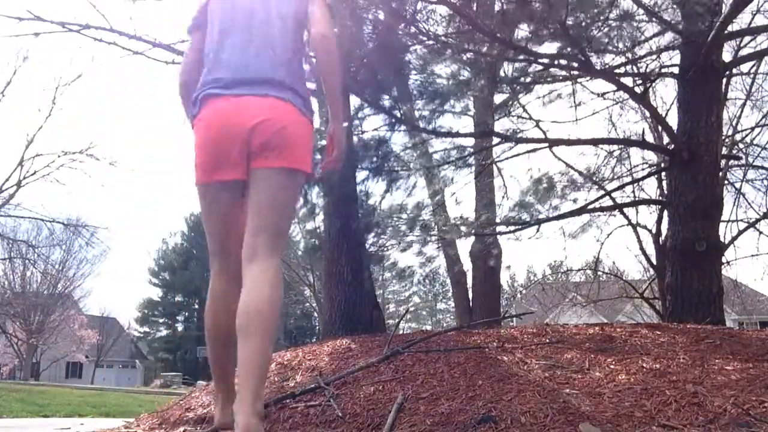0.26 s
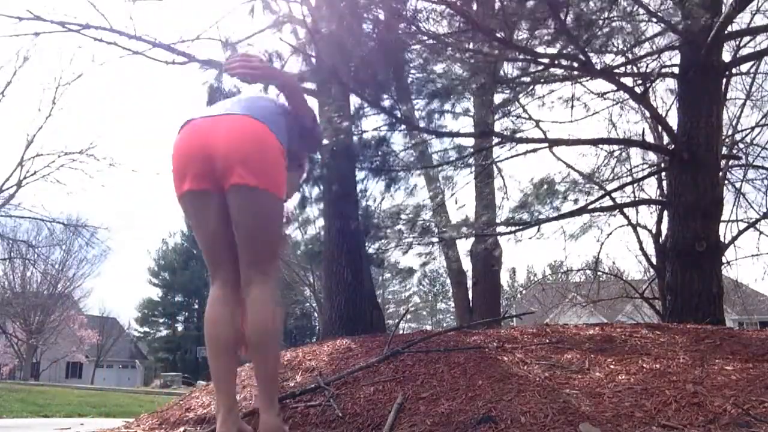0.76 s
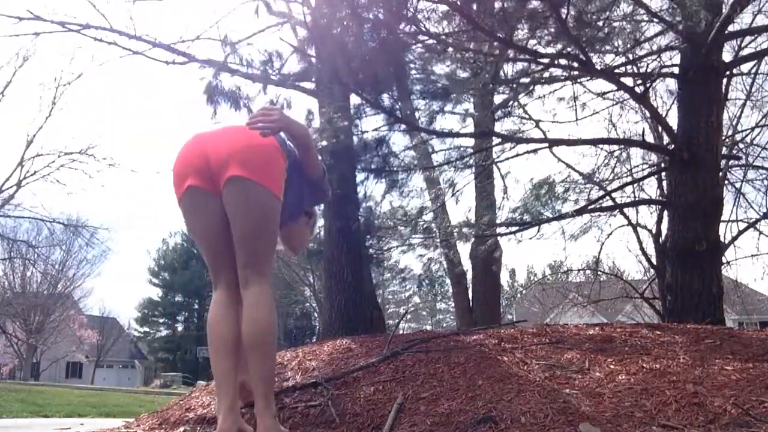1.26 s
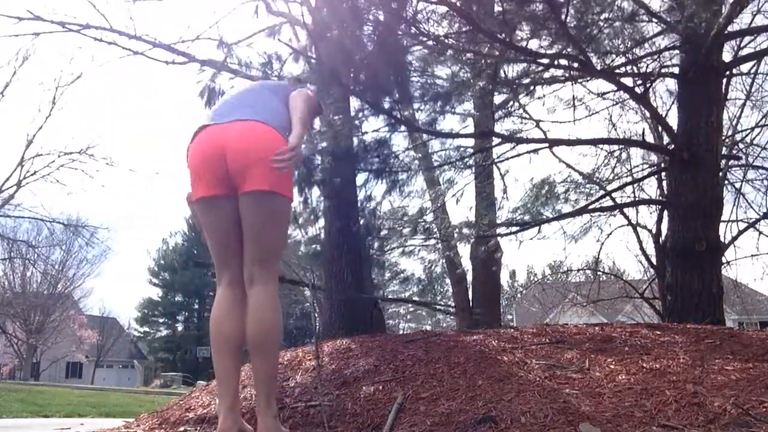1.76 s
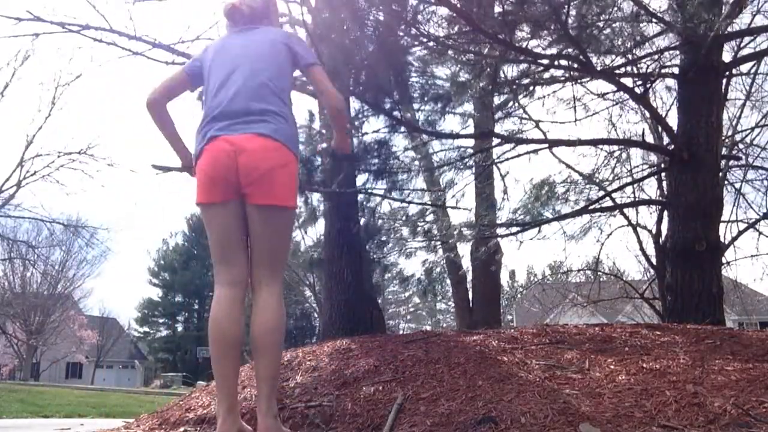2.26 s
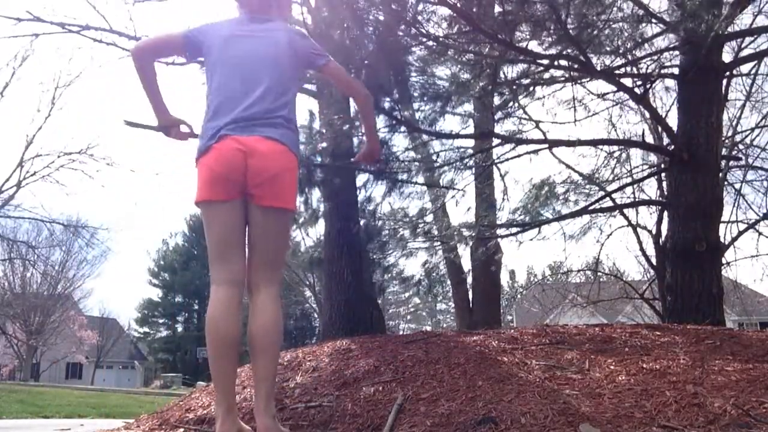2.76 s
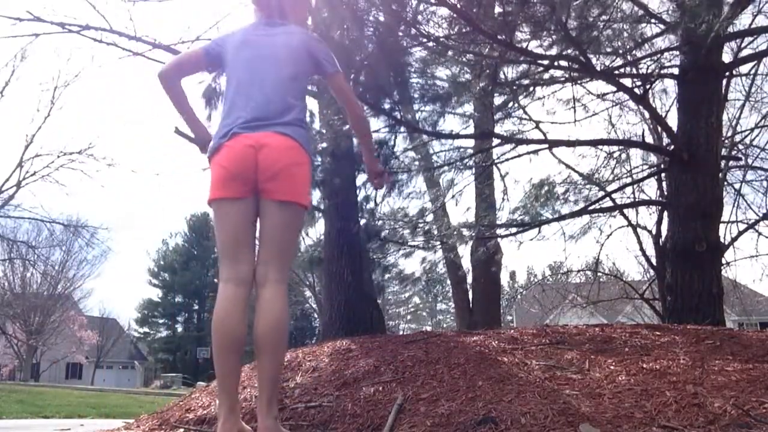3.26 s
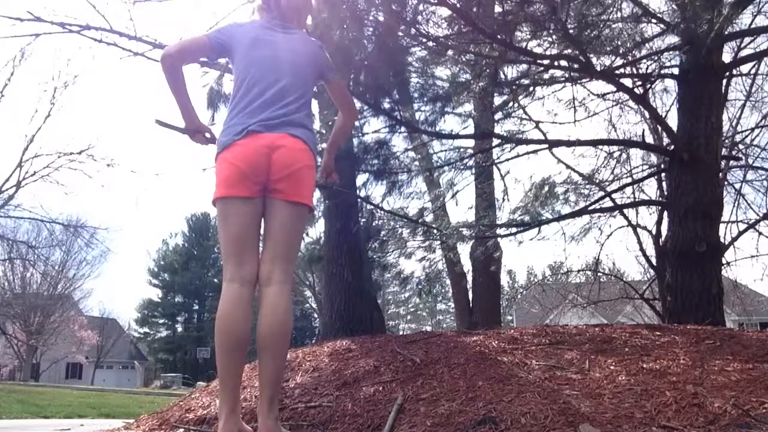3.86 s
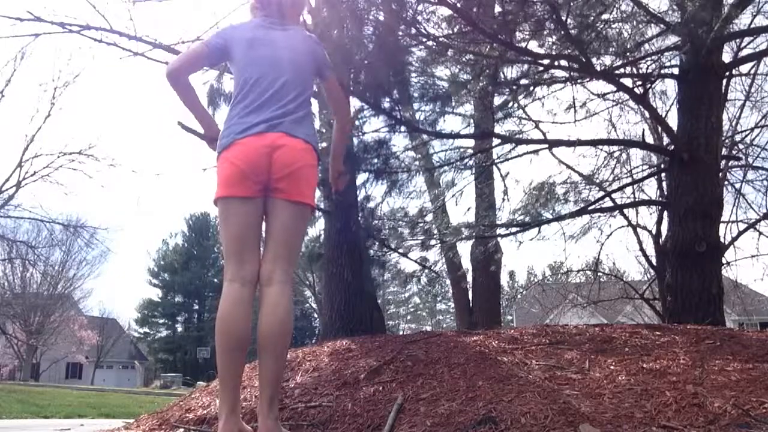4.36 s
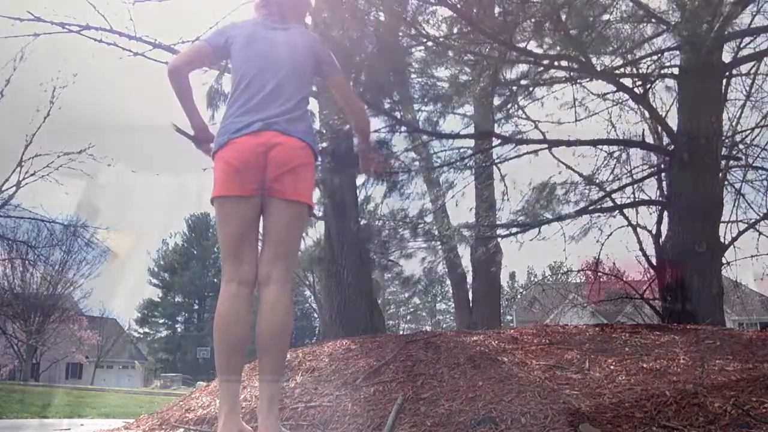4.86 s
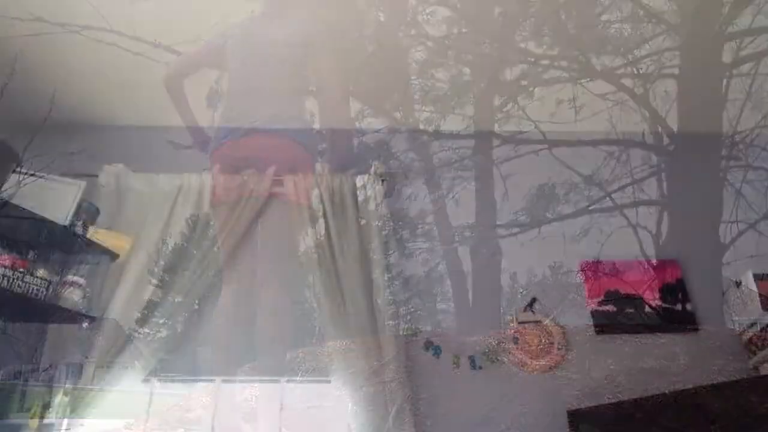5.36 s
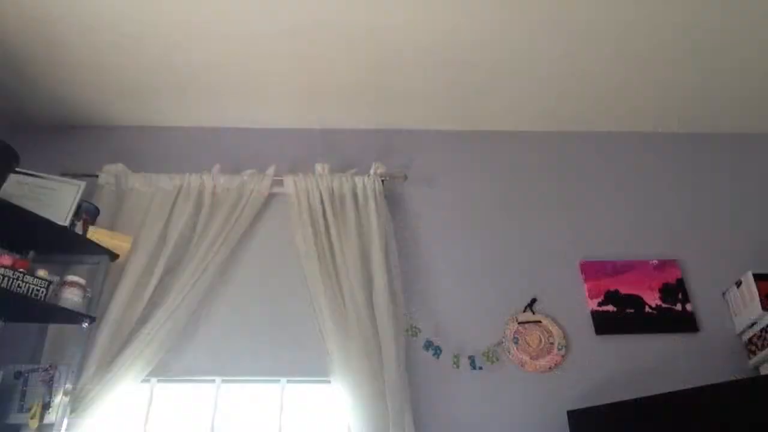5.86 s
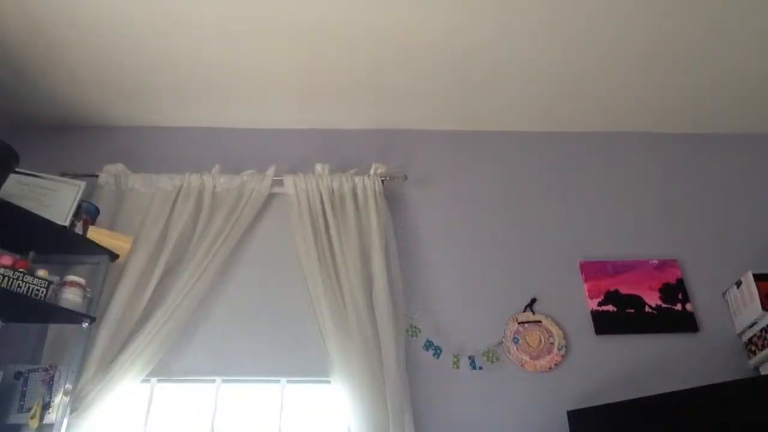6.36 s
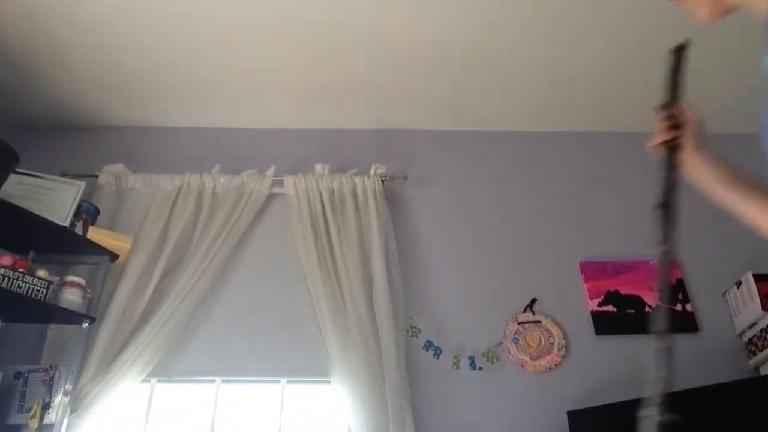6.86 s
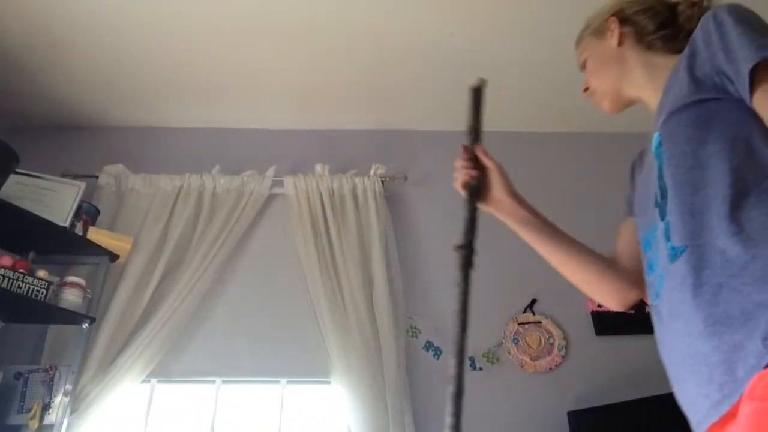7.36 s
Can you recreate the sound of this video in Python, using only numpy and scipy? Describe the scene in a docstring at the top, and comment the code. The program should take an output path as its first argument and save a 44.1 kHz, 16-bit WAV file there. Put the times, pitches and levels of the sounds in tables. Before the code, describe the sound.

In a garden, low wind rumble and faint hiss surround the microphone as small birds chirp and wood chips crackle lightly. Gusts thump harder, then a dry stick breaks with one loud crack and, over a second later, another, both echoing off trunks and a wall. The sound fades to a quiet bedroom, where the stick judders, scrapes and groans along the floor before soft cloth rustle.

```python
"""Wind buffets the microphone over distant traffic and hiss: shaped noise follows gust curves, with pulses for eddies.
Small birds call in gliding sines. Someone on a mound of wood chips picks up a dry stick and snaps it twice,
in noise bursts that nearby trunks, a house wall and the trees throw back.
The garden's hiss fades into the tone of a quiet bedroom, where the stick slides, judders and scrapes
along the floor, as jerks and dense grains ring its bending modes, and clothes rustle in shaped noise."""
import sys
import numpy as np
from scipy import signal
from scipy.fft import rfft, irfft, next_fast_len
from scipy.io import wavfile
from scipy.ndimage import uniform_filter1d, map_coordinates

SR = 44100
rng = np.random.default_rng(int(sys.argv[2]) if len(sys.argv) > 2 else 0)


def dump_mix(stems):
    """Bounce the given channels to the path in sys.argv[1] as a 16-bit WAV at rate SR."""
    frames = np.atleast_2d(stems).T  # one column per channel
    limited = np.clip(frames, -1, 1)  # hard clip at full scale
    pcm = np.round(limited * 32767).astype(np.int16)
    wavfile.write(sys.argv[1], SR, pcm)


N = 334719
TIME = np.arange(N) / SR   # s
LEAD = SR // 200   # samples of run-in before a burst


def from_db(db):
    """Amplitude factor for a level in dB."""
    return 10 ** (np.asarray(db) / 20)


def unit_energy(x):
    """Scale a sound to energy 1."""
    return x / np.sqrt(np.sum(x ** 2) + 1e-20)


def rms_one(x):
    """Scale a sound to rms 1."""
    return unit_energy(x) * np.sqrt(len(x))


def gains(rows):
    """Gain curves from rows of (s, dB, ..), silent outside their span."""
    s, *columns = np.transpose(rows)
    inside = (TIME >= s[0]) * (TIME <= s[-1])
    return [from_db(np.interp(TIME, s, column)) * inside for column in columns]


def colour(x, points):
    """Shape a sound by (Hz, dB) points; beyond the ends it falls 24 dB an octave."""
    size = next_fast_len(len(x) + 1024)
    f = np.maximum(np.fft.rfftfreq(size, 1 / SR), 1)
    hz, db = np.transpose(points)
    skirts = np.minimum(1, np.minimum(f / hz[0], hz[-1] / f)) ** 4
    shape = from_db(np.interp(np.log(f), np.log(hz), db))
    return irfft(rfft(x, size) * skirts * shape, size)[:len(x)]


def noise(points):
    """Steady noise shaped by (Hz, dB) points; rms 1."""
    return rms_one(colour(rng.standard_normal(N), points))


def dying_noise(t60):
    """One second of noise that loses 60 dB in t60 seconds; energy 1."""
    fall_db = -60 * np.minimum(TIME[:SR] / max(t60, 1e-4), 5)
    return unit_energy(rng.standard_normal(SR) * from_db(fall_db))


def add(out, s, sound):
    """Mix a sound into out from s seconds on."""
    at = max(round(s * SR), 0)
    out[at:at + len(sound)] += sound[:max(len(out) - at, 0)]


def through(x, response):
    """Pass a sound through an impulse response."""
    return signal.fftconvolve(x, response)[:N]


def evened(x, window_s):
    """Take the slow swells out of a noise; rms 1."""
    return x / np.sqrt(uniform_filter1d(x ** 2, max(int(window_s * SR), 2)) + 1e-9)


def even_spectrum(x, width_hz):
    """Keep the fine ripple of a spectrum but level its broad colour; energy 1."""
    spectrum = rfft(x)
    power = uniform_filter1d(np.abs(spectrum) ** 2, max(int(width_hz * len(x) / SR), 2))
    return unit_energy(irfft(spectrum / np.sqrt(power + 1e-12), len(x)))


def high_pass(x, hz):
    """Remove what lies below hz."""
    return signal.sosfilt(signal.butter(4, hz, "high", fs=SR, output="sos"), x)


def lifted(x, hz, width_hz, lift_db):
    """Raise one resonance out of a sound."""
    return x + (from_db(lift_db) - 1) * signal.lfilter(*signal.iirpeak(hz, hz / width_hz, fs=SR), x)


def grains(per_s):
    """Tiny clicks of random size at random moments; rms 1."""
    return rms_one((rng.random(N) < per_s / SR) * rng.standard_normal(N))


def scattered(t60, per_s):
    """One second of dying grains, drawn separately in each band; bands evenly balanced, energy 1."""
    edges_hz = [100, 1000, 2000, 3000, 4200, 5600, 7200, 9000, 11000, 13500, 16500]
    out = 0
    for low, high in zip(edges_hz, edges_hz[1:]):
        clicks = dying_noise(t60) * (rng.random(SR) < per_s / SR) + 1e-18
        band = signal.butter(2, [low, high], "band", fs=SR, output="sos")
        out = out + np.sqrt(high - low) * unit_energy(signal.sosfilt(band, clicks))
    return unit_energy(out)


def burst(length_s):
    """A very short tearing noise, near even in spectrum, that starts abruptly after LEAD samples; energy 1."""
    x = np.pad(dying_noise(length_s), (LEAD, 0))
    gate = np.pad(np.clip(2 - TIME[:SR] / length_s, 0, 1), (LEAD, 0))
    for _ in range(4):   # flatten the spectrum, then confine it in time again
        x = gate * irfft(np.exp(1j * np.angle(rfft(x))), len(x))
    return unit_energy(x)


def swell(start, length, attack, release):
    """Attack, hold and release, 0-1."""
    return np.clip(np.minimum((TIME - start) / attack, (start + length - TIME) / release), 0, 1)


def wind(lumpy_db=3.5, gusty_db=2):
    """Turbulence at the port: a lumpy rumble, a flutter that grows faster in gusts, eddies that push and pull."""
    # Gust curve at the microphone. Each row: time in seconds, strength in dB.
    gusts = [(0, -59.5), (0.1, -51.5), (0.48, -54), (0.56, -50.5), (0.62, -48), (0.7, -48), (0.84, -54),
             (0.95, -48.5), (1.05, -55), (1.4, -53), (1.53, -49), (1.78, -52.5), (1.9, -48), (2.04, -41),
             (2.13, -40.5), (2.24, -53), (2.38, -58.5), (2.44, -35.5), (2.52, -31.5), (2.58, -44),
             (2.66, -38), (2.84, -36), (2.94, -32.5), (3.07, -45), (3.16, -36), (3.56, -33), (3.586, -44.5),
             (3.62, -31), (3.77, -35), (3.81, -42), (3.92, -49), (4.62, -52), (5.14, -49), (5.23, -41.5),
             (5.38, -47), (5.6, -65)]
    # Single eddies that hit the port. Each row: time in seconds, peak in dB before the port's colour.
    buffets = [(0.568, -34.5), (0.668, -36), (0.683, -34), (0.724, -37), (0.792, -35.5), (1.671, -36),
               (1.981, -35.5), (2.019, -25.5), (2.139, -30.5), (2.435, -28.5), (2.501, -29.5), (2.648, -19),
               (2.678, -27.5), (2.722, -9.5), (2.929, -17), (3.045, -26.5), (3.1459, -21), (3.173, -22.5),
               (3.2119, -23), (3.3158, -18), (3.3452, -20.5), (3.421, -27), (3.481, -29.5), (3.53, -21),
               (3.631, -24.5), (3.663, -23.5), (3.765, -23.5), (3.826, -27), (3.868, -26), (4.027, -34.5),
               (4.203, -24.5), (4.388, -39), (4.858, -30), (4.944, -39.5), (5.157, -32.5), (5.238, -24.5),
               (5.305, -26), (5.375, -25)]
    # Colour of the low rumble. Each row: frequency in Hz, relative level in dB per Hz.
    rumble_colour = [(15, -55.5), (25, -34), (119, 1.5), (171, 2), (253, -3), (295, -13), (420, -33),
                     (550, -45.5), (920, -120)]
    # Colour of the higher flutter. Each row: frequency in Hz, relative level in dB per Hz.
    flutter_colour = [(180, -57.5), (290, 6), (380, -6.5), (500, -20), (700, -26), (1200, -53.5)]
    flutter_db, flutter_growth = 0.5, 1.484   # level at full-scale wind; dB gained per dB of wind
    eddy_s = 0.001   # half width of an eddy
    swirl_s, swirl_db = 0.009, -12.5   # half width and relative level of the rough air around it

    strength = gains(gusts)[0] * from_db(gusty_db * noise([(4, 0), (14, 0.0043)]))
    eddies = np.zeros(N)
    u = TIME[:SR // 50] / eddy_s - 5   # time from the eddy's centre, in half widths
    push_pull = u * np.exp((1 - u ** 2) / 2)
    for s, db in buffets:
        add(eddies, s - 5 * eddy_s, from_db(db) * push_pull)
        swirl = np.exp(-np.minimum(((TIME - s) / swirl_s) ** 2 / 2, 20))
        strength = np.hypot(strength, from_db(db + swirl_db) * swirl)
    lumps = from_db(lumpy_db * noise([(15, 0.012), (60, 0.0174)])) * rng.standard_normal((2, N))
    rumble = strength * evened(colour(lumps[0], rumble_colour), window_s=0.0462)
    flutter = evened(colour(lumps[1], flutter_colour), window_s=0.024)
    flutter = from_db(flutter_db) * strength ** flutter_growth * flutter
    return rumble + flutter + colour(eddies, [(70, -18.5), (160, 1.0), (400, -1.0), (900, 17.0)])


def indoors():
    """The share of the bedroom tone in the cross-fade, 0-1."""
    fade_start_s, fade_end_s = 4.68, 5.54
    return np.clip((TIME - fade_start_s) / (fade_end_s - fade_start_s), 0, 1)


def garden_tone():
    """Distant traffic and hiss as steady shaped noise, until the fade."""
    # Each row: frequency in Hz, relative level in dB per Hz.
    tone_colour = [(210, -2), (350, 1), (397, -0.5), (451, -3), (572, -2.5), (2980, -20), (4030, -22),
                   (4640, -22.5), (6580, -23), (14500, -23), (15500, -25.5)]
    return from_db(-56.5) * noise(tone_colour) * (1 - indoors())


def twigs():
    """Small dry cracks underfoot and along the bending stick: dying noise, some dull, some bright."""
    # The louder cracks of twigs and chips. Each row: time in seconds, strength in dB,
    # tilt in dB per octave between 2 and 13 kHz, ring (60 dB decay) in seconds.
    cracks = [(0.373, -28, -6, 0.017), (0.82, -32, -4, 0.012), (1.2725, -29, 11, 0.012),
              (1.7053, -28, 29, 0.024), (1.7995, -32.5, 14, 0.026), (1.936, -31, 8, 0.024),
              (2.144, -32, 9, .022), (2.222, -22, -5, 0.026), (2.401, -16, -1, 0.009),
              (2.5346, -24.5, 0, .03), (2.553, -31, 5.5, 0.0083), (2.5855, -24.5, -4.5, 0.0096),
              (2.64, -33, 1, .01), (2.7157, -23.5, 0.5, 0.0078), (2.733, -32.5, 2, 0.011),
              (3.061, -34.5, 2, .015), (3.7715, -26, 0, 0.035), (3.931, -26.5, -7.5, 0.016),
              (3.937, -29.5, -6, .012), (4.2295, -24.5, -8, 0.015), (5.1046, -34.5, 18, 0.025)]
    # Colour of dry twigs. Each row: frequency in Hz, relative level in dB per Hz.
    twig_colour = [(400, -9.5), (1500, -4.5), (3400, 7.5), (4600, 5.5), (7000, -0.5), (10000, 6),
                   (15000, -10)]
    out, hz = np.zeros(N), np.array([2000, 13000])
    for s, db, tilt, t60 in cracks:
        low_db, high_db = tilt * np.log2(hz / hz[0])
        slope = [(100, low_db), (hz[0], low_db), (hz[1], high_db), (SR / 2, high_db)]
        crack = colour(colour(dying_noise(t60), twig_colour), slope)
        add(out, s, from_db(db) * unit_energy(crack))
    return out


def near_echo(x):
    """A surface next to the microphone repeats the wood a fraction of a millisecond later and hollows it."""
    # Delay of that reflection as the stick is moved. Each row: time in seconds, delay in seconds.
    delays = [(3.09, 0.00015), (4.35, 0.00016)]
    delay = np.interp(TIME, *np.transpose(delays))
    return from_db(-6.5) * map_coordinates(x, [(TIME - delay) * SR], order=3)


def garden(x, branches_db=-13, wall_db=-17, behind_wall_db=-19.5):
    """Trunks return separate echoes, ground and branches scatter the rest, a house wall answers, trees trail off."""
    # Nearby trunks and the mound, each in its own colour. Each row: delay in seconds, level in dB,
    # centre frequency in Hz, 60 dB decay in seconds.
    trunk_echoes = [(.0108, -31.5, 6900, .008), (.0148, -23, 4200, 0.014), (.0185, -22.5, 4200, 0.015),
                    (0.015, -27, 9000, .009), (.0468, -27.5, 3900, 0.014)]
    # Colour of the far tail. Each row: frequency in Hz, relative level in dB.
    tree_colour = [(300, -8), (2000, 2), (4000, 1), (8000, -5), (14000, -10)]
    # How strongly sound leaves toward the wall. Each row: time in seconds, level in dB, treble level in dB.
    wall_aim = [(3.1, 5, -1.5), (4.35, -3, -1)]
    wall_echo_s = .0585

    branch_colour = [(200, -2), (1200, -5), (3000, -3.0), (4200, -1.0), (8000, 0.0), (16000, 7.5)]
    near = from_db(branches_db) * colour(scattered(t60=0.16, per_s=2500), branch_colour)
    for delay, db, hz, t60 in trunk_echoes:
        echo = colour(np.pad(dying_noise(t60), (LEAD, 0)), [(hz / 2, -9), (hz, 0), (2 * hz, -14)])
        add(near, delay - LEAD / SR, from_db(db) * unit_energy(echo))

    wall = from_db(wall_db) * dying_noise(t60=0.009)
    wall = wall + from_db(behind_wall_db) * scattered(t60=0.24, per_s=2500)
    answer = np.zeros(SR)
    add(answer, wall_echo_s, colour(wall, [(300, -29.5), (3000, -6.5), (6500, -2), (10000, -1.5), (15000, -5)]))
    tail = from_db(-20.5) * colour(dying_noise(t60=1.0), tree_colour)

    s, *aims = np.transpose(wall_aim)
    aim, treble_aim = (from_db(np.interp(TIME, s, db)) for db in aims)
    treble = colour(x, [(10000, 0), (20000, 0)])
    toward_wall = aim * (x - treble) + treble_aim * treble
    return x + through(x, near + tail) + through(toward_wall, answer)


def whistle(rows, waver=0.011):
    """A near sine that follows rows of (s, Hz, dB), with a slightly unsteady pitch."""
    s, hz, db = np.transpose(rows)
    t = TIME[:int(s[-1] * SR)]
    drift = rms_one(uniform_filter1d(rng.standard_normal(len(t)), SR // 400))
    pitch = np.interp(t, s, hz) * (1 + waver * drift)
    return np.sin(2 * np.pi * np.cumsum(pitch) / SR) * from_db(np.interp(t, s, db)) * (t >= s[0])


def birds(edge_db=-10, near_echo_db=-9, song_waver=0.011):
    """Gliding sines: one syllable sung five times, fading, never quite alike, and chirps; the trees smear them."""
    # One syllable is four strokes from the two sides of the syrinx. Each row: start within the syllable
    # in seconds, length in seconds, first, middle and last frequency in Hz, relative level in dB.
    syllable = [(.001, 0.0214, 4200, 4540, 4860, -1.5), (.011, 0.018, 3540, 4090, 3700, -6),
                (.026, .027, 4300, 3750, 2640, -2), (.028, .03, 2596, 2790, 2900, -0.5)]
    # The repeats of the syllable. Each row: start in seconds, pitch ratio.
    song = [(.926, 0.99), (1.044, 0.97), (1.158, 1), (1.283, .99), (1.392, 0.98)]
    # Birds other than the singer. Each row: start in seconds, length in seconds, first, middle and last
    # frequency in Hz, level in dB before the final trim, pitch waver as a share.
    chirps = [(0.53, 0.079, 4120, 4050, 3880, -61, 0.092), (0.56, 0.084, 6700, 6700, 6640, -65, .05),
              (1.445, 0.043, 10700, 10250, 10400, -61, .018), (3.853, 0.02, 4450, 4190, 3300, -51.5, .012),
              (3.875, 0.018, 3700, 3970, 3880, -54.5, 0.0067), (4.148, 0.045, 3150, 3530, 3590, -51, .012),
              (4.145, 0.05, 4200, 4250, 4140, -57.5, .02), (4.288, 0.033, 2500, 3190, 3330, -46.5, .01),
              (4.326, 0.031, 3510, 4170, 3867, -47, .008), (5.142, 0.048, 4160, 4510, 4270, -53, 0.026)]
    song_db, song_fade_db = -46.5, 1.5   # first syllable, before the final trim; mean loss per syllable

    strokes = list(chirps)
    for k, (s, ratio) in enumerate(song):
        for lag, length, first, middle, last, db in syllable:
            stroke_db = song_db - k * song_fade_db + db + 1.9 * rng.standard_normal()
            strokes.append((s + lag, length, ratio * first, ratio * middle, ratio * last, stroke_db, song_waver))
    out = np.zeros(N)
    for s, length, first, middle, last, db, waver in strokes:
        glide = [(0, first, edge_db), (length / 2, middle, 0), (length, last, edge_db)]
        add(out, s, from_db(db) * whistle(glide, waver))
    far_colour = [(2000, 2.5), (2900, 1), (3600, -4.0), (4500, -5.5), (8000, -0.5)]
    smear = from_db(near_echo_db) * dying_noise(t60=.12) + colour(dying_noise(t60=0.99), far_colour)
    return from_db(-2.0) * (out + through(out, smear))   # final trim


def rustle():
    """A fine crackle of grains with a few small cracks at random."""
    # Chips shift under the feet and bark rubs in the hands. Each row: start in seconds,
    # length in seconds, level in dB.
    stirs = [(0.716, 1, -68.5), (1.676, 0.33, -66.5), (2.308, 0.11, -62.5), (2.49, 0.29, -62.5)]
    # Colour of chips and bark. Each row: frequency in Hz, relative level in dB per Hz.
    chip_colour = [(2000, 5), (5000, -4), (9000, 1), (15000, -6)]
    level = sum(from_db(db) * swell(s, length, attack=0.017, release=0.062) for s, length, db in stirs)
    cracks = through(grains(per_s=30), dying_noise(t60=0.018))
    return level * rms_one(colour(grains(per_s=1600) + from_db(-0.5) * cracks, chip_colour))


def snaps(tear_s=0.0031, splinter_db=-14.5, splinter_t60=0.045, upper_width_hz=2800, lower_width_hz=500):
    """The fibres part within milliseconds in a broad crack; splinters follow, over two raised resonances."""
    # The stick breaks. Each row: time in seconds, strength in dB, lows, mids and highs in relative dB,
    # upper ring in Hz, its lift in dB, lower ring in Hz, its lift in dB.
    breaks = [(3.0878, 7.5, -3, -4, 5.5, 7400, -2, 5320, 4),
              (4.3200, -12.5, -20.5, -24, 6, 7400, 4, 5360, 5.5),
              (4.3225, -15, -15.5, -11.5, -3, 7000, 10.5, 5300, 5.5),
              (4.3506, 10, -2.5, 3.5, 12, 6770, 10, 4230, 2)]
    # Colour of dry wood. Each row: frequency in Hz, relative level in dB per Hz.
    wood_colour = [(150, -20.5), (400, -11), (1200, -6), (2000, 0.5), (3200, -3), (4400, -1), (5600, -5),
                   (7500, -1.5), (9600, -3), (12000, -8.5), (14500, -11.5)]
    out = np.zeros(N)
    for s, db, lows_db, mids_db, highs_db, upper_hz, upper_db, lower_hz, lower_db in breaks:
        splinters = np.pad(scattered(splinter_t60, per_s=560), (LEAD, 0))
        crack = colour(burst(tear_s) + from_db(splinter_db) * splinters, wood_colour)
        balance = [(100, lows_db), (1100, lows_db), (2000, mids_db), (3000, mids_db / 2),
                   (6000, 0.0049), (10000, 0.0012), (15000, highs_db)]
        crack = lifted(colour(crack, balance), upper_hz, upper_width_hz, upper_db)
        crack = lifted(crack, lower_hz, lower_width_hz, lower_db)
        add(out, s - LEAD / SR, from_db(db) * unit_energy(crack))
    return out


def room_tone():
    """The quiet bedroom as steady shaped noise, rising in the fade."""
    # Each row: frequency in Hz, relative level in dB per Hz.
    tone_colour = [(29, -55), (50, -3), (268, -1.5), (404, 1), (489, -6), (607, -8), (1830, -22.5),
                   (2440, -19.5), (3030, -18.5), (3420, -23.5), (3950, -20.5), (6850, -21.5),
                   (14100, -20.5), (15500, -25)]
    return from_db(-60) * noise(tone_colour) * indoors()


def stick_in_room(force, tail_db):
    """Contact forces ring the stick's bending modes; the bedroom adds one clear reflection and a short tail."""
    # Colour of the scraped stick. Each row: frequency in Hz, relative level in dB per Hz.
    scrape_colour = [(76, -59), (130, -14.5), (270, 0.5), (365, -11.5), (543, -5.5), (841, -13.5),
                     (911, -19), (1070, -19.5), (1300, -14), (1620, -19), (2020, -19), (3730, -28.5),
                     (10700, -42.5), (15000, -50)]
    # Bending modes. Each row: frequency in Hz, width in Hz, level in dB relative to the scrape.
    modes = [(291, 21, -11), (420, 32, -17), (548.6, 23, -7.5), (792, 23, -17.5), (911, 18, -13),
             (1326, 180, -22), (1880, 82, -30.5), (2575, 230, -22)]
    room_echo_s = .0105   # first reflection
    response = dying_noise(t60=0.0086) + from_db(tail_db) * dying_noise(t60=0.26)
    echo_colour = [(100, -10.0), (900, 3.5), (1400, -4), (2500, -15), (16000, 14)]
    add(response, room_echo_s, colour(dying_noise(t60=0.017), echo_colour))
    response = even_spectrum(np.pad(response, (LEAD, 0)), width_hz=200)
    response = unit_energy(colour(response, scrape_colour))
    for hz, width_hz, db in modes:
        mode = np.sin(2 * np.pi * hz * TIME[:SR]) * np.exp(-np.pi * width_hz * TIME[:SR])
        add(response, LEAD / SR, from_db(db) * unit_energy(mode))
    return signal.fftconvolve(force, unit_energy(response))[LEAD:LEAD + N]


def moving_resonance(rows, reach_hz):
    """Friction noise in one resonance that follows rows of (s, Hz, dB), reaching reach_hz to each side."""
    s, hz, db = np.transpose(rows)
    carrier = np.sin(2 * np.pi * np.cumsum(np.interp(TIME, s, hz)) / SR)
    friction = evened(noise([(5, 0), (reach_hz, -3)]), window_s=0.01)
    return gains(np.c_[s, db])[0] * rms_one(carrier * friction)


def sliding_stick(chatter_per_s=75, chatter_db=-6, groan_reach_hz=90, rasp_reach_hz=260):
    """The tip runs on in dense grains with a fast chatter, over a hollow and a thin resonance that move."""
    # Two slides without a stop, a list for each. Each row: time in seconds, scrape level in dB before colour.
    slides = [
        [(4.95, -83), (5.1, -60.5), (5.2, -58), (5.37, -53), (5.52, -63.5)],
        [(6.254, -78), (6.263, -53), (6.33, -57), (6.43, -54), (6.485, -53), (6.55, -59.5), (6.62, -54),
         (6.78, -55.5), (6.93, -67)],
    ]
    # The contact resonance falls as the tip digs in, then fades.
    # Each row: time in seconds, frequency in Hz, level in dB.
    groan = [(6.256, 1058, -64), (6.278, 748, -49.5), (6.3, 422, -58), (6.315, 309, -50.5),
             (6.36, 312, -50), (6.405, 294, -44.5), (6.45, 302.6, -52), (6.52, 310, -66), (6.56, 310, -75)]
    # A thinner, wider resonance of the rubbing tip, a list for each stroke.
    # Each row: time in seconds, frequency in Hz, level in dB.
    rasp_strokes = [
        [(5.2, 1500, -87), (5.37, 1900, -65), (5.48, 2220, -84)],
        [(6.258, 2050, -61.5), (6.31, 1805, -65), (6.42, 1950, -62), (6.49, 1950, -67), (6.53, 1920, -76)],
        [(6.62, 1000, -67), (6.76, 1302, -57.5), (6.82, 1200, -60), (6.89, 950, -68)],
    ]
    unsteady = 1 + .3 * noise([(5, 0.0047), (40, 0.0054)])
    turns = np.cumsum(chatter_per_s * unsteady) / SR
    chatter = rms_one(1.0 * (np.diff(np.floor(turns), prepend=0) > 0))   # one click a turn
    friction = evened(grains(per_s=1800), window_s=0.02) + from_db(chatter_db) * chatter
    force = sum(gains(slide)[0] for slide in slides) * friction
    rub_colour = [(100, 1.4), (300, 2.5), (600, 8.8), (1000, 7.9), (2000, 5.9), (3500, 7.2), (7000, 6.3),
                  (16000, 7.6)]
    rasps = sum(moving_resonance(stroke, rasp_reach_hz) for stroke in rasp_strokes)
    scrape = stick_in_room(colour(force, rub_colour), tail_db=3.0)
    return scrape + moving_resonance(groan, groan_reach_hz) + rasps


def juddering_stick():
    """The tip catches and lets go in runs of jerks, each a soft, short rasp with a bright tick."""
    # The tip catches on the floor and jerks free. Each row: time in seconds, strength in dB,
    # tick level in dB before its colour.
    jerks = [(5.441, -18.5, -54), (5.462, -21, -48), (5.484, -19.5, -50), (5.525, -18, -51),
             (5.555, -18.5, -54), (5.598, -15.5, -45), (5.63, -17.5, -37), (5.658, -16, -45),
             (5.703, -15, -40), (5.741, -14, -38), (5.785, -13.5, -35.5), (5.82, -15, -50),
             (5.861, -14.5, -46), (5.868, -22.5, -38), (5.93, -16, -56), (6.036, -14.5, -34.5),
             (6.05, -20, -37), (6.066, -17, -36), (6.091, -17.5, -36), (6.104, -14.5, -36),
             (6.117, -19, -37), (6.128, -17.5, -35), (6.141, -35, -41)]
    rasp_s, tick_t60 = 0.0069, 0.009   # length of the rasp's grip; 60 dB decay of the tick
    force, ticks = np.zeros(N), np.zeros(N)
    grip = np.sqrt(np.clip(1 - TIME[:SR // 20] / rasp_s, 0, 1))
    for s, db, tick_db in jerks:
        rasp = np.pad(grip * rng.standard_normal(len(grip)), (LEAD, 0))
        add(force, s - LEAD / SR, from_db(db) * even_spectrum(rasp, width_hz=280))
        add(ticks, s, from_db(tick_db) * dying_noise(tick_t60))
    bright = colour(ticks, [(2000, -17), (5000, 6.5), (12000, 6.5), (15500, -2)])
    return stick_in_room(force, tail_db=2.5) + bright


def clothes():
    """Clothes rustle: shaped noise in uneven swells."""
    # Each row: time in seconds, level in dB before a 1 dB lift.
    swells = [(6.3, -67), (6.824, -60.5), (7.072, -66), (7.122, -56), (7.222, -69.5), (7.28, -59.5),
              (7.352, -86), (7.488, -67.5), (7.514, -71), (7.59, -63.5)]
    # Colour of the cloth. Each row: frequency in Hz, relative level in dB per Hz.
    cloth_colour = [(710, -41.5), (1200, 2.5), (1390, -2), (1470, -3.5), (1860, -2), (2050, -3), (3110, -5),
                    (15500, -6.5)]
    return from_db(1.0) * gains(swells)[0] * noise(cloth_colour)


def scuff():
    """The stick is set on the floor with a brief scuff of shaped noise."""
    # Each row: time in seconds, level in dB.
    touch = [(7.185, -64), (7.2, -59), (7.215, -60), (7.228, -76)]
    # Colour of the scuff. Each row: frequency in Hz, relative level in dB per Hz.
    touch_colour = [(1200, -4), (1700, 2), (3200, -3), (4500, 1), (5500, -7)]
    return gains(touch)[0] * noise(touch_colour)


def scene():
    """Garden and bedroom together, in one channel."""
    wood = snaps() + twigs() + rustle()
    outside = wind() + garden_tone() + garden(wood + birds()) + near_echo(wood)
    inside = room_tone() + sliding_stick() + juddering_stick() + clothes() + scuff()
    return (outside + high_pass(inside, hz=109))[None]


def record(dry):
    """The input clips peaks beyond 0.92 of full scale, then cuts the top above 15.5 kHz."""
    top_cut = signal.ellip(10, .2, 85, 15500, fs=SR, output="sos")
    return signal.sosfilt(top_cut, np.clip(dry, -.92, .92))


dry = scene()
out = record(dry)
dump_mix(out)
```